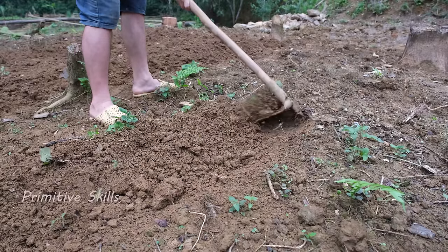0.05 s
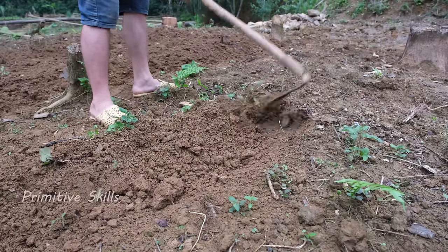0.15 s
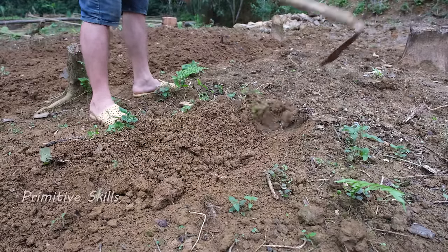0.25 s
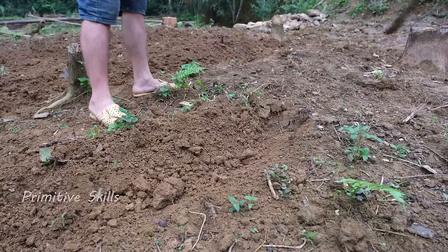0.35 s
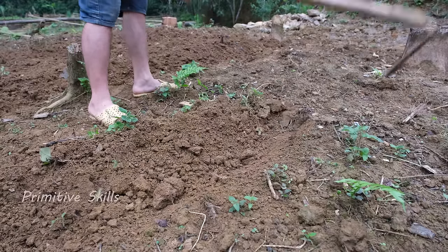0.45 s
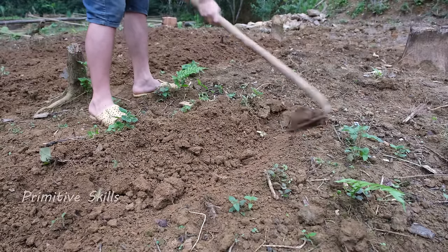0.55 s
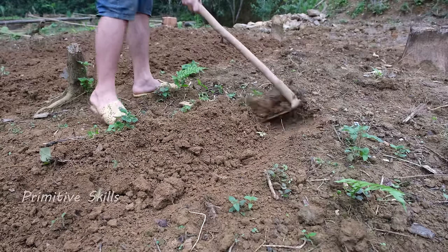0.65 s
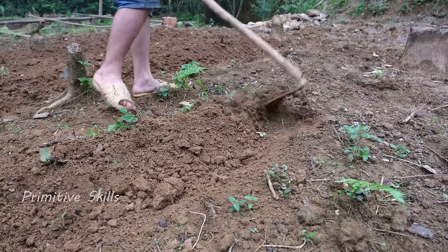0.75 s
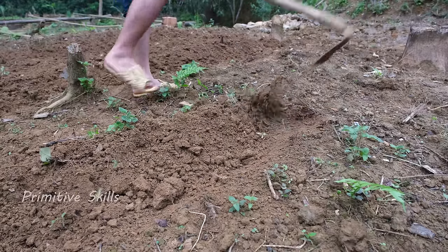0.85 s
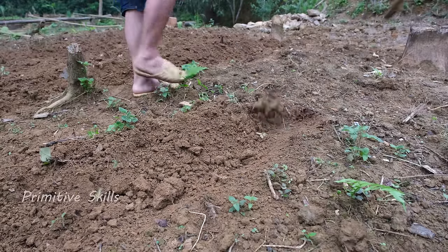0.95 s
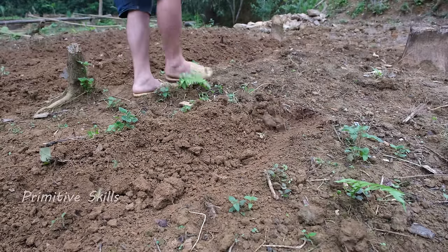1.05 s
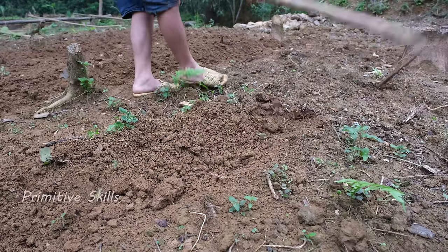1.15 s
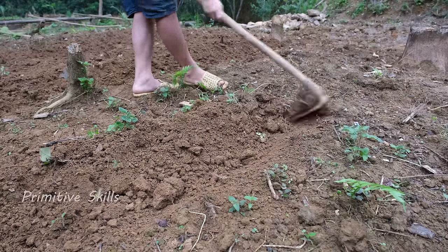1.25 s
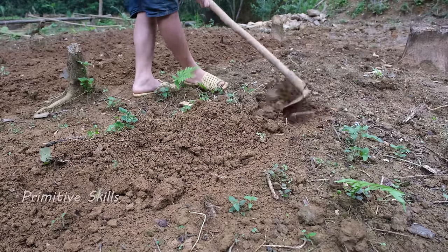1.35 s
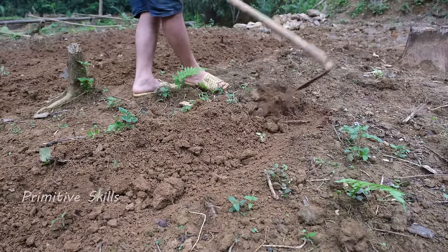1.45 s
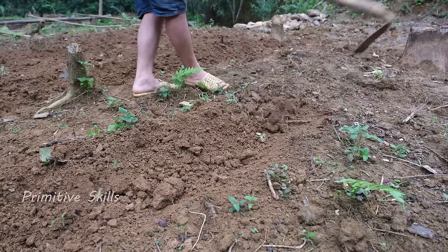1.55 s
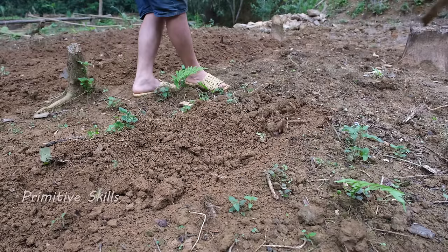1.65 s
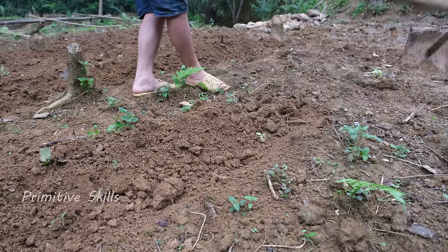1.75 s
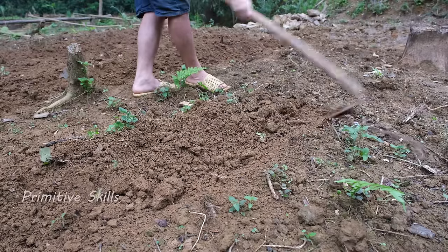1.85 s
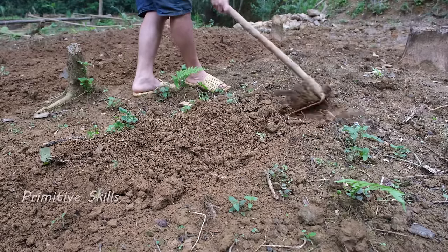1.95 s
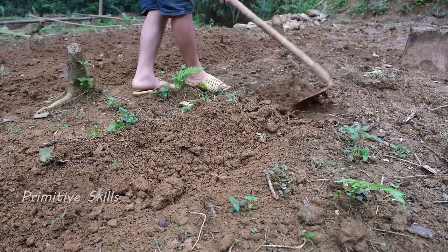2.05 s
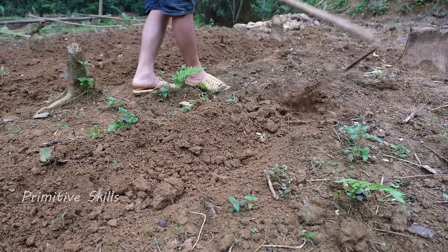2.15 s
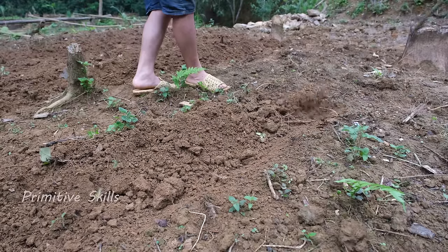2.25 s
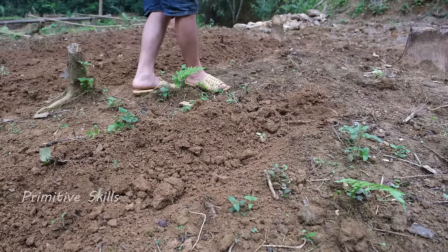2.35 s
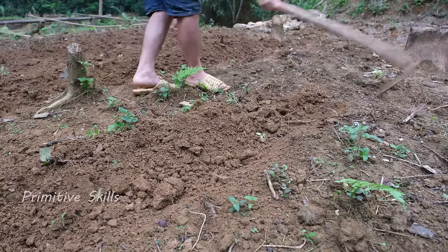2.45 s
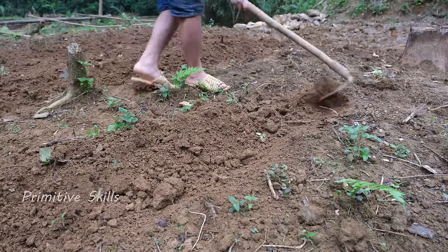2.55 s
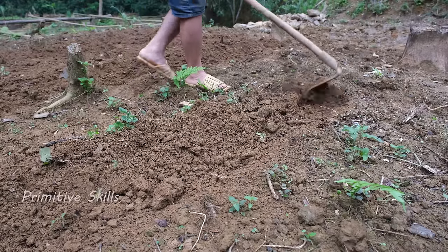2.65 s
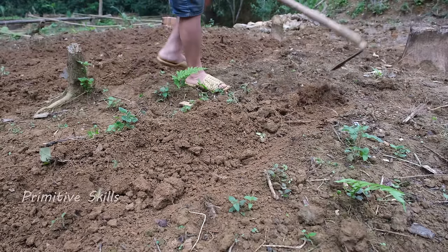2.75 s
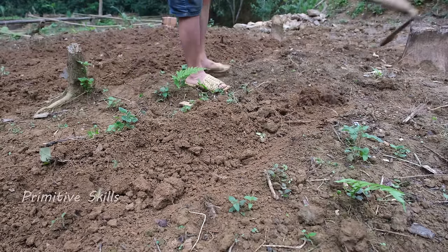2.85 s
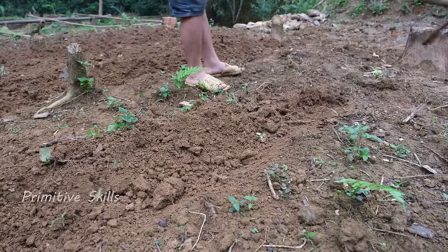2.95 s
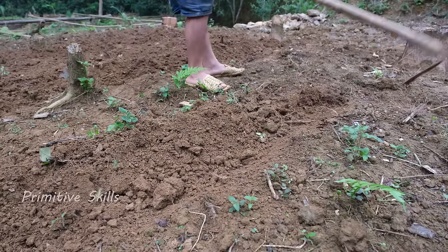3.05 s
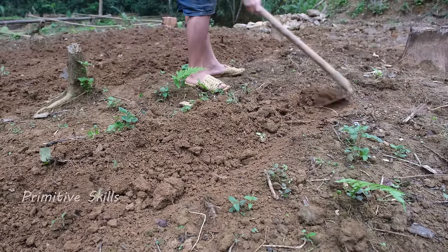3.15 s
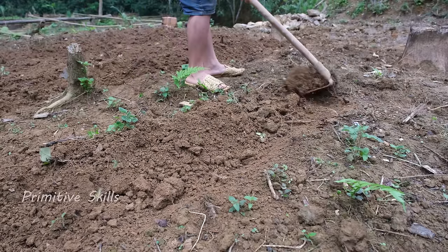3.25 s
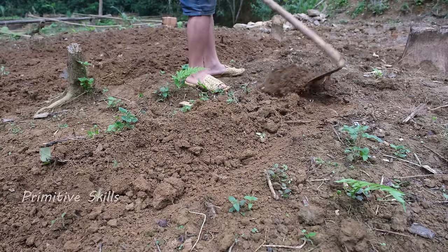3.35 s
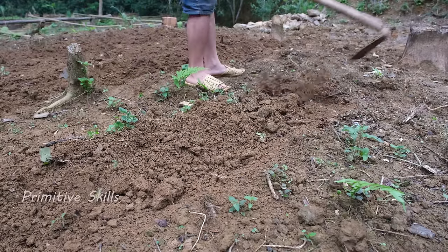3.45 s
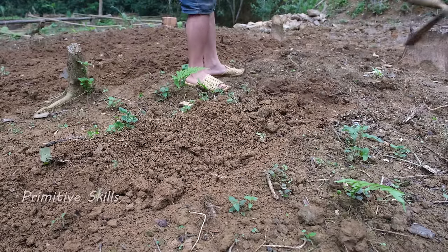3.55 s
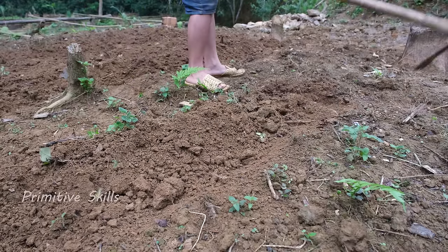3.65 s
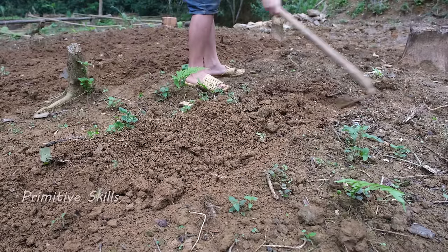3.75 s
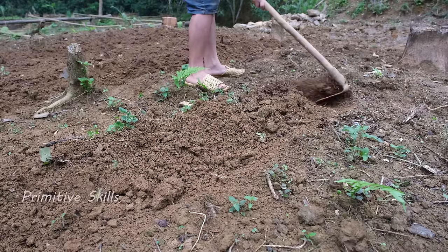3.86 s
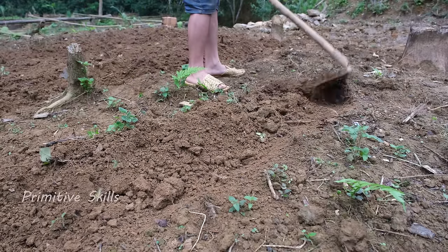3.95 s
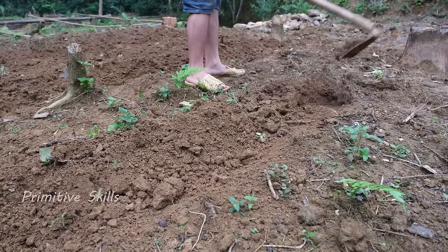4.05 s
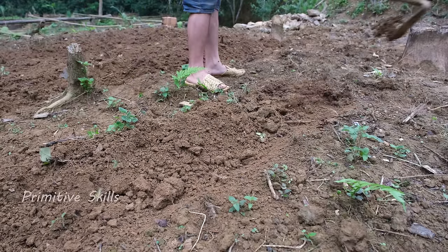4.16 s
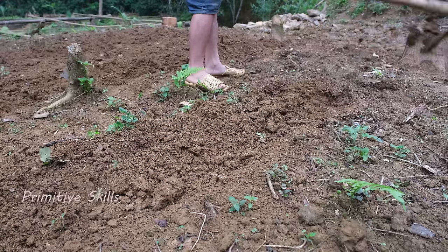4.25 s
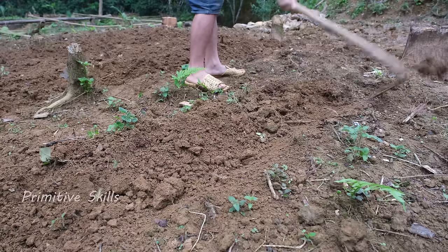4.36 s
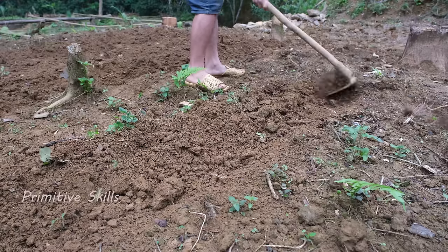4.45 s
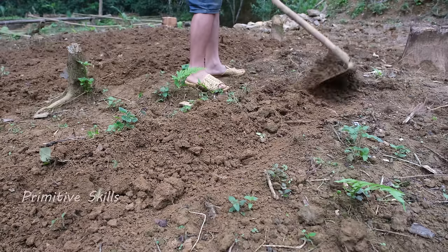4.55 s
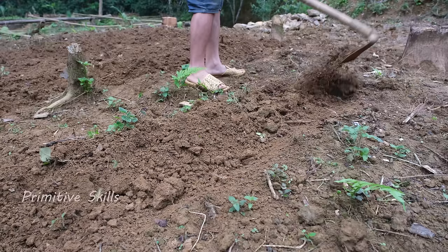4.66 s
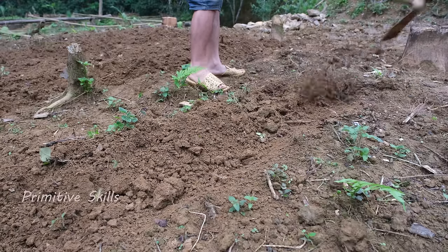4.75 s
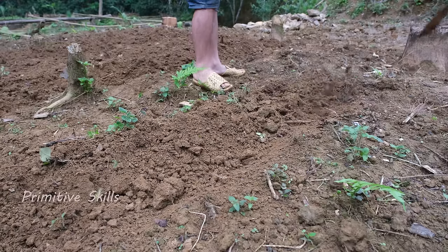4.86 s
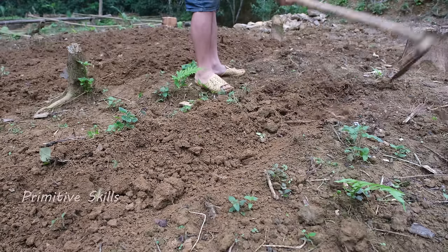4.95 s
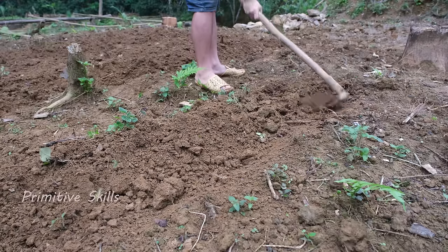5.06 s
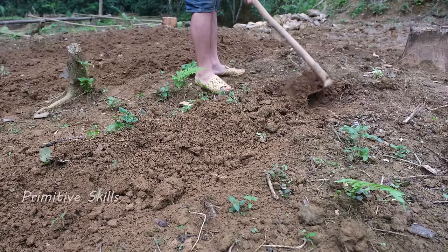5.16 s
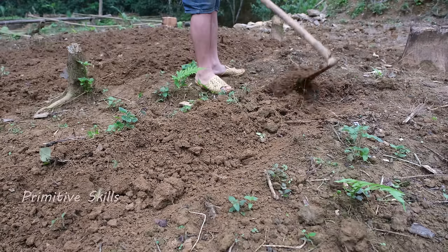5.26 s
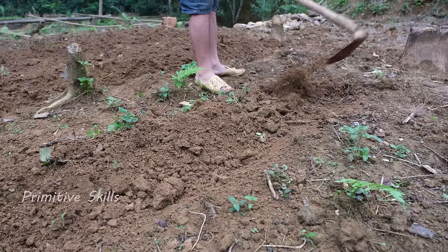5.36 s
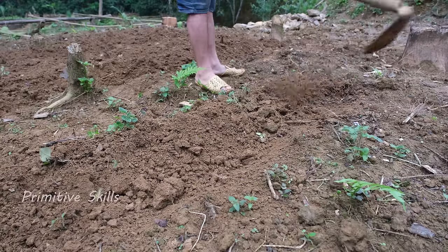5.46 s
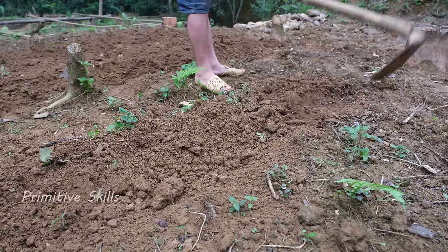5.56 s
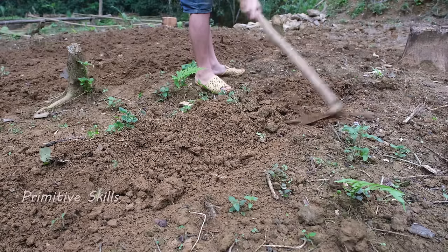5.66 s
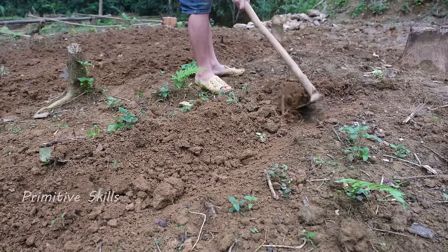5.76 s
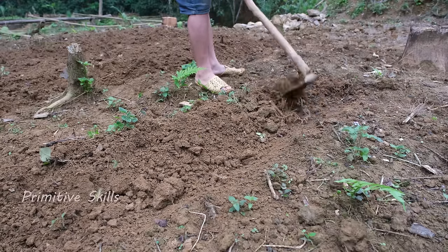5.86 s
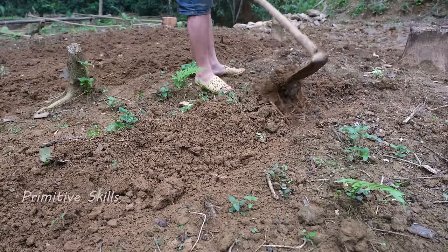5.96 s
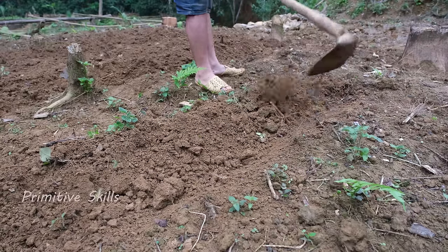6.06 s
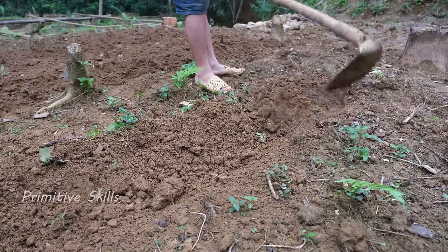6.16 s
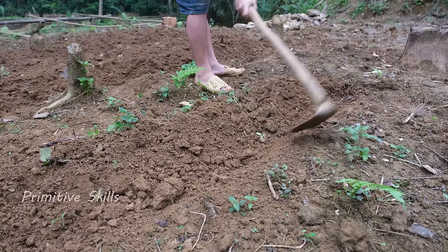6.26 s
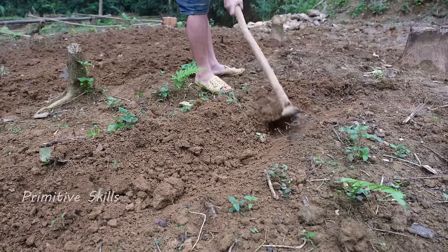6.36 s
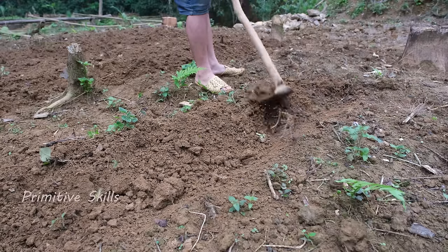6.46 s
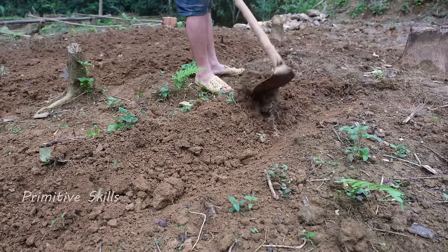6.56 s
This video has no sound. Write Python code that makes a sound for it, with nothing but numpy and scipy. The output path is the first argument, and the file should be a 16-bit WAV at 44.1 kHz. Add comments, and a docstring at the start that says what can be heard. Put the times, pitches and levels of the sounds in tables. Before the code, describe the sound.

In a quiet open field, a hoe bites into bare soil in a steady rhythm, close and straight ahead with almost no echo. The crust cracks with a low bump, small clods tick down and loose dirt trickles between strokes. Some strokes add a brief scrape or a dull knock on something buried. A distant bird gives one faint trill near the middle and three soft notes at the close.

```python
"""An open field, the microphone close to a hand hoe working clumpy bare earth straight ahead.
We come in on the tail of a stroke, over soft country hush. Every 0.63 s or so the blade breaks the
crust in quick bites, the ground shakes, crumbs settle, and loose soil patters off the lifted blade.
At 1 s a foot shifts; near 2.8 s a small bird trills far off. The hoe works on, now and then knocking
a buried stone or root, and the bird closes with three faint notes."""
import sys
import numpy as np
from scipy import signal
from scipy.fft import rfft, irfft
from scipy.io import wavfile
from scipy.ndimage import uniform_filter1d

SR = 44100
rng = np.random.default_rng(int(sys.argv[2]) if len(sys.argv) > 2 else 0)


def master(y):
    """Save y as 16-bit WAV."""
    cut = np.clip(np.atleast_2d(y).T, -1, 1)
    pcm = np.round(cut * 32767)  # scale
    wavfile.write(sys.argv[1], SR, pcm.astype(np.int16))


N = 291060
TIME = np.arange(N) / SR


def from_db(db):
    """Decibels to gain."""
    return 10 ** (np.asarray(db) / 20)


def rms_one(x):
    """Scale to rms 1."""
    return x / np.sqrt(np.mean(x ** 2) + 1e-20)


def bins(size):
    """Frequencies of a spectrum, kept above zero."""
    return np.maximum(np.arange(size // 2 + 1) * SR / size, 1)


def at_hz(points, hz):
    """A tone curve in dB, read on a log-frequency axis."""
    freq, db = np.transpose(points)
    return np.interp(np.log(hz), np.log(freq), db)


def humps(rows, hz):
    """Resonance peaks and dips in dB."""
    return sum(db / (1 + (np.log(hz / centre) / width) ** 2) for centre, width, db in rows)


def colour(x, db):
    """Causal (minimum-phase) filter with the given dB in each bin."""
    cepstrum = irfft(np.log(from_db(db)))
    cepstrum[1:len(x) // 2] *= 2
    cepstrum[len(x) // 2 + 1:] = 0
    return irfft(rfft(x) * np.exp(rfft(cepstrum)))


def drift(rate_hz):
    """A random wander of spread about 1."""
    knots = rng.standard_normal(4000)
    return np.interp(TIME * rate_hz, np.arange(len(knots)), knots)


def bump(s, width_s, db):
    """A smooth swell around one moment."""
    return from_db(db) * np.exp(-((TIME - s) / width_s) ** 2)


def grains(per_s, spread_db, size=N):
    """Random tiny fractures, most small and a few large; rms 1."""
    born = rng.random(size) < per_s / SR
    strength = from_db(spread_db * np.minimum(rng.exponential(1, size), 4))
    return rms_one(born * strength * rng.choice([-1, 1], size))


def choked_ring(t, hz, db, t60, rise_s=0.0021):
    """One mode that swells at once and dies in the soil."""
    return from_db(db - 60 * t / t60) * (1 - np.exp(-t / rise_s)) * np.sin(2 * np.pi * hz * t)


# tone of a faint high hiss: (frequency [Hz], gain [dB])
HISS_CURVE = [(100, -18.5), (3000, -3), (8000, 8), (14000, 4), (16000, -15)]

def high_hiss(level_db=-82):
    """A faint high hiss, different in left and right."""
    shape = at_hz(HISS_CURVE, bins(N))
    return from_db(level_db) * np.array([rms_one(colour(rng.standard_normal(N), shape)) for _ in "LR"])


# ambience of the field: (frequency [Hz], gain [dB])
HUSH_CURVE = [(18, -52), (30, -24.5), (103, -6.5), (153, -7.5), (189, 0.5), (221, -8.5), (287, -6),
              (486, -5), (526, -6.5), (844, -2), (1190, -8.5), (3490, -17.5), (7870, -30), (14800, -42),
              (16000, -43)]
# broad humps in it: (centre [Hz], width [ratio], gain [dB])
HUSH_PEAKS = [(277.3, 0.09, 7), (907, 0.087, 3.5), (3390, 0.059, 5.5)]

def hush(level_db=-61.5, waver_db=0.5):
    """Distant countryside, wavering slightly."""
    hz = bins(N)
    air = rms_one(colour(rng.standard_normal(N), at_hz(HUSH_CURVE, hz) + humps(HUSH_PEAKS, hz)))
    return air * from_db(level_db + waver_db * drift(7.4))


def echoes(x, t60, dull_hz):
    """Sound scatters back to the microphone from the slope and the trees."""
    t = TIME[:SR]
    tail = rng.standard_normal(SR) * from_db(-60 * t / t60) * (1 - np.exp(-t / 0.0037))
    tail = signal.sosfilt(signal.butter(1, dull_hz, fs=SR, output="sos"), tail)
    return signal.fftconvolve(x, tail / np.sqrt(np.sum(tail ** 2)))[:N]


# faint single notes: (time [s], start pitch [Hz], end pitch [Hz], level [dB])
BIRD_NOTES = [(6.455, 4050, 3730, -64), (6.515, 4000, 3730, -69), (6.565, 3250, 3650, -61.5)]

def bird(trill_at_s=2.797, step_s=0.0593, trill_hz=(3000, 4110), chirp_s=0.0213, note_s=0.026):
    """Far off, an even trill and later single notes: whistles that glide fast, level off and fade."""
    trill = [(trill_at_s + k * step_s, *trill_hz, -57 - 3 * place ** 2, chirp_s)
             for k, place in enumerate(np.linspace(-1, 1, 6))]   # loudest in the middle
    notes = [(*note, note_s) for note in BIRD_NOTES]
    out = 0
    for s, start_hz, end_hz, db, length in trill + notes:
        progress = np.clip((TIME - s) / length, 0, 1)
        pitch = end_hz + (start_hz - end_hz) * (1 - progress) ** 2
        accent = 0.67 + 0.5 * np.exp(-((progress - 0.27) / 0.12) ** 2)
        swell = np.sin(np.pi * progress ** 0.57) * accent
        out += from_db(db) * swell * np.sin(2 * np.pi * np.cumsum(pitch) / SR)
    return out


# tone of falling crumbs: (frequency [Hz], gain [dB])
CRUMB_CURVE = [(200, -10), (1000, 5.5), (2500, 2.5), (5200, 1.5), (7500, -15.5), (12000, -13),
               (16000, -12.5)]
# a low swing brushes loose soil just before it bites: (time [s], level [dB])
LOW_SWINGS = [(1.232, -63), (5.697, -53.5), (6.328, -53)]

def spills(lift_after_s=0.33, trickle_db=-68):
    """Crumbs patter in a faint trickle, swelling off the lifted blade, under a low swing or a foot."""
    lifts = sum(bump(s + lift_after_s, width_s=0.049, db=-69.5) for s, *_ in HOE_STROKES)
    swings = sum(bump(s, width_s=0.013, db=db) for s, db in LOW_SWINGS)
    foot = bump(1.03, width_s=0.055, db=-65.5)
    flow = lifts + swings + foot + from_db(trickle_db)
    return colour(flow * grains(per_s=1800, spread_db=1), at_hz(CRUMB_CURVE, bins(N)))


def ground(start_hz=112, end_hz=50, glide_s=0.0515, rumble=0.87):
    """The shake crosses uneven ground: its lowest waves arrive last, blurred by scattered rumble."""
    out = 0
    for s, *_, thud_db, _, _ in HOE_STROKES:
        t = np.maximum(TIME - s, 0)
        turns = end_hz * t + (start_hz - end_hz) * glide_s * (1 - np.exp(-t / glide_s))
        thud = from_db(thud_db) * np.exp(-t / 0.065)
        slow_wave = bump(s + 0.094, width_s=0.029, db=-65)
        blur = rumble * np.minimum(t / 0.0056, 1) * drift(170)
        out += (thud + slow_wave) * (blur - np.sin(2 * np.pi * turns))
    return signal.sosfilt(signal.butter(2, 36, "high", fs=SR, output="sos"), out)


# tone of settling soil: (frequency [Hz], gain [dB])
SETTLING_CURVE = [(60, -0.5), (200, 10), (800, 13), (1600, 6.5), (3300, 5.5), (5200, -2), (7500, -12.5),
                  (12000, -8.5), (16000, -16)]

def settling(rise_s=0.0028):
    """Broken earth keeps crumbling after each stroke: fine grit with a few larger crumbs."""
    flow = 0
    for s, *_, level_db, decay_s in HOE_STROKES:
        t = np.maximum(TIME - s, 0)
        flow += from_db(level_db) * np.minimum(t / rise_s, 1) * np.exp(-t / decay_s)
    grit = 0.93 * grains(per_s=5000, spread_db=4.5)
    crumbs = 0.56 * grains(per_s=220, spread_db=4)
    return colour(flow * (grit + crumbs), at_hz(SETTLING_CURVE, bins(N)))


# the blade slides back out of the earth: (start [s], end [s], level [dB])
PULLS = [(-.04, 0.028, -54.5), (1.318, 1.35, -50.5), (1.991, 2.066, -50.5), (5.78, 5.841, -49.5)]
# tone of grit on the blade: (frequency [Hz], gain [dB])
SCRAPE_CURVE = [(300, -18), (1700, -2), (2400, -1), (3600, -4.5), (5300, 1.5), (7000, -15), (12000, -17),
                (16000, -25)]

def scrapes(release_s=0.0078, catch_db=2.9):
    """Grit catches and slips along the blade until it comes free."""
    rub = sum(from_db(db) * np.interp(TIME, [start, end, end + release_s], [0, 1, 0]) ** 0.5
              for start, end, db in PULLS)
    catching = from_db(catch_db * drift(120))
    return colour(rub * catching * grains(per_s=1500, spread_db=2), at_hz(SCRAPE_CURVE, bins(N)))


# strokes of the hoe, also driving spills, ground and settling: (time [s], entry lead [s],
#   entry level [dB], bite length [s], bite level [dB], bass weight [dB], treble grit [dB],
#   clod ring [Hz], ring gain [dB], ground thud [dB], settling level [dB], settling decay [s])
HOE_STROKES = [(-.055, .004, -39, .004, -28, 0, 0, 1500, 6, -49.5, -47.5, 0.054),
               (.5764, .0034, -37.5, 0.0049, -25, 1.5, -0.5, 4830, 6, -52.5, -43.5, 0.039),
               (1.2548, 0.0064, -40, 0.006, -20.5, -9.5, -5, 516, 15, -50.5, -44.5, 0.04),
               (1.8952, 0, -43, 0.0011, -33.5, -6, 26.5, 940, 5, -52, -43.5, 0.043),
               (2.528, 0.0021, -44, .0023, -35.5, 10.5, 15.5, 1160, 11.5, -56, -44, 0.035),
               (3.168, 0.0063, -37.5, 0.0026, -21, -13.5, -0.5, 2340, 10.5, -56, -43, 0.025),
               (3.7974, 0.0047, -40.5, 0.002, -23, -2, 11.5, 3470, 14, -64, -40, 0.019),
               (4.431, .004, -35.5, 0.0028, -27, 0, 8.5, 845, 10.5, -61, -50.5, 0.066),
               (5.075, .0095, -34, 0.0046, -27.5, -2.5, -1.5, 4500, 4.5, -59.5, -46, 0.023),
               (5.7049, 0.0078, -41.5, 0.0029, -24, -8.5, 2.5, 580, 14, -59, -49, 0.043),
               (6.3358, 0.0052, -42, 0.0056, -36, 15, 3.5, 1660, 5, -57, -49, 0.029)]
# hard earth splits deeper down:
#   (time [s], length [s], level [dB], bass weight [dB], treble grit [dB], ring [Hz])
DEEP_SPLITS = [(.589, 0.00089, -27, -1, 2.5, 2960), (1.263, 0.0018, -25, 5.5, 6.5, 6200),
               (1.2807, 0.004, -32, -14, 1, 930), (1.8986, 0.0097, -36, 5.5, 8, 1820),
               (1.9165, 0.0058, -28.5, -2.5, -6, 880), (2.5363, 0.0059, -32.5, 1, 3, 2110),
               (3.186, 0.016, -41, -0.5, 9.5, 1960), (4.438, 0.0083, -33.5, 5.5, 2, 1130),
               (4.451, 0.0096, -23.5, -4.5, -24.5, 1820)]
# loose clods knock on the blade or land: (time [s], level [dB], ring [Hz])
LOOSE_CLODS = [(.077, -43.5, 1690), (.611, -35, 1850), (.637, -44, 2810), (0.666, -46.5, 3300),
               (.744, -50, 2690), (1.306, -43, 1790), (1.325, -38, 4180), (1.9538, -35.5, 1090),
               (1.988, -45, 2500), (2.064, -48, 2400), (2.946, -55, 554), (4.52, -52.5, 340),
               (5.1671, -36.5, 2520), (5.76, -43, 1770), (6.418, -42, 873)]

def contacts():
    """Every impact: (time [s], length [s], level [dB], weight [dB], grit [dB], ring [Hz], ring [dB])."""
    for s, lead, entry_db, length, db, weight_db, grit_db, ring_hz, ring_db, *_ in HOE_STROKES:
        yield s - lead, 0.0019 + 0.45 * lead, entry_db, 9.5, -0.5, ring_hz, 0   # edge pierces loose soil
        yield s, length, db, weight_db, grit_db, ring_hz, ring_db   # main bite
        yield s + 0.006, 0.0089, -41.5, 7, -11, ring_hz, 0   # blade sinks on and slows
    for split in DEEP_SPLITS:
        yield *split, 9
    for s, db, ring_hz in LOOSE_CLODS:
        weight_db = 7.5 * np.log2(2040 / ring_hz)   # bigger clods ring lower and weigh more
        yield s, 0.0027, db, weight_db, -3.5, ring_hz, 9.5


# buried stones and roots under the blade: (time [s], pitch [Hz], level [dB], t60 [s])
STONES_AND_ROOTS = [(.576, 252, -22, .025), (3.17, 1756, -23.5, .02), (4.432, 3280, -17, 0.013),
                    (4.459, 1550, -20, 0.028), (5.705, 4920, -16.5, 0.011)]

def knocks(weight_share=0.55):
    """Contacts set the hoe ringing, heavy ones most; stones and roots add their own short ring."""
    force = np.zeros(N)
    for s, _, db, weight_db, *_ in contacts():
        if s > 0:
            force[round(s * SR)] += from_db(db + weight_share * weight_db)
    hoe_ring = choked_ring(TIME[:SR // 2], hz=831, db=-6, t60=0.032)
    buried = sum(choked_ring(np.clip(TIME - s, 0, 0.2), hz, db, t60)
                 for s, hz, db, t60 in STONES_AND_ROOTS)
    return signal.fftconvolve(force, hoe_ring)[:N] + buried


# tone of breaking soil, close up: (frequency [Hz], gain [dB])
SOIL_CURVE = [(50, -20), (200, 1.5), (500, -3.5), (800, 4), (1100, 0.5), (2000, -1.5), (3300, 0),
              (5000, -6), (7500, -14.5), (12000, -18), (16000, -27)]
# resonances of the hoe, damped by the soil: (centre [Hz], width [ratio], gain [dB])
HOE_RESONANCES = [(843, 0.13, 1.5), (944, 0.058, -3.5), (1230, 0.073, 3.5), (1673, 0.019, 3),
                  (2480, 0.017, 4.5), (4890, 0.041, 4)]

def bites(size=4096, snap=0.71, snap_s=0.00092):
    """Each bite is a snap and a brief avalanche of fractures, heard through soil, hoe and struck clod."""
    out, t, hz = np.zeros(N + 2 * size), np.arange(size) / SR, bins(size)
    body = at_hz(SOIL_CURVE, hz) + humps(HOE_RESONANCES, hz)
    for s, length, level_db, weight_db, grit_db, ring_hz, ring_db in contacts():
        rise_s, decay_s = 0.18 * length, 0.0019 + 0.35 * length
        force = np.minimum(t / rise_s, 1) * np.exp(-np.maximum(t - length, 0) / decay_s)
        force *= 0.9 + snap * np.exp(-((t - rise_s) / snap_s) ** 2)   # the crust gives way at once
        burst = force * grains(per_s=14000, spread_db=3.5, size=size)
        # the work of a bite spreads evenly over broad bands; only the fine ripple is chance
        band_power = uniform_filter1d(np.abs(rfft(burst)) ** 2, size=90)
        burst = colour(burst, 10 * np.log10(np.sum(force ** 2) / (band_power + 1e-12)))
        shelves = weight_db / (1 + (hz / 1000) ** 2) + grit_db / (1 + (5000 / hz) ** 2)
        ring = humps([(ring_hz, 0.13, ring_db)], hz)
        at = size + round(s * SR)
        out[at:at + size] += colour(burst, body + shelves + ring + level_db)
    return out[size:size + N]


def scene():
    """All straight ahead of the microphone: the hoe close and nearly dry, the bird far and echoing."""
    hoe = bites() + knocks() + settling() + scrapes()
    song = bird()
    hoe_echo = from_db(-31) * echoes(hoe, t60=0.39, dull_hz=1510)
    song_echo = from_db(-4) * echoes(song, t60=1.0, dull_hz=7000)
    return hoe + hoe_echo + song + song_echo + ground() + spills() + hush() + high_hiss()


def record(dry, cutoff_hz=16100):
    """A steep low-pass cuts the highest treble."""
    return signal.sosfilt(signal.ellip(10, 0.1, 80, cutoff_hz, fs=SR, output="sos"), dry)


dry = scene()
out = record(dry)
master(out)
```